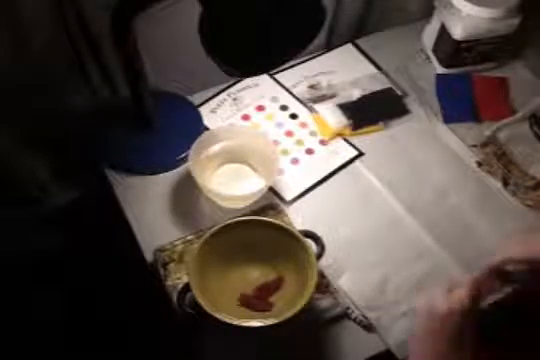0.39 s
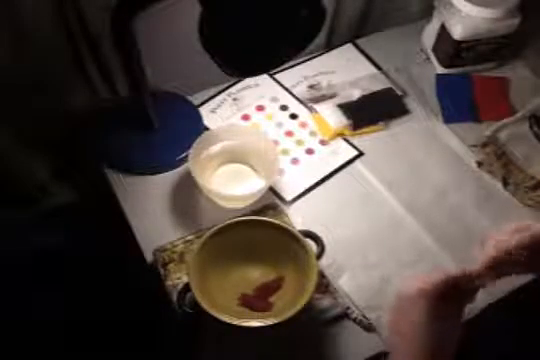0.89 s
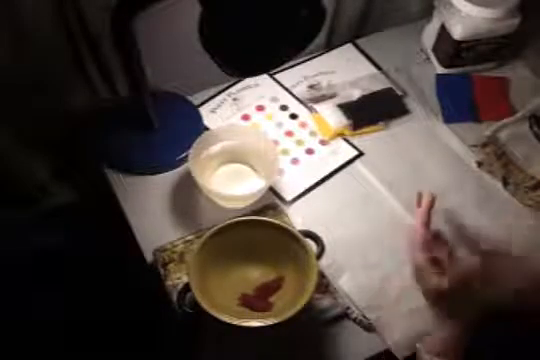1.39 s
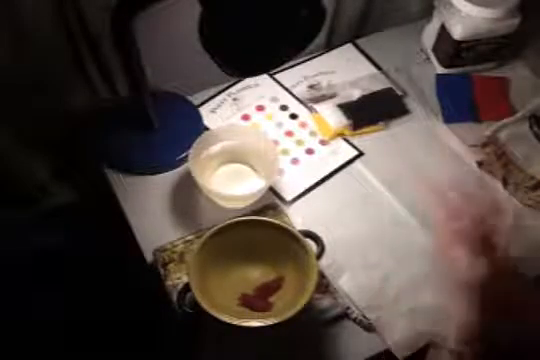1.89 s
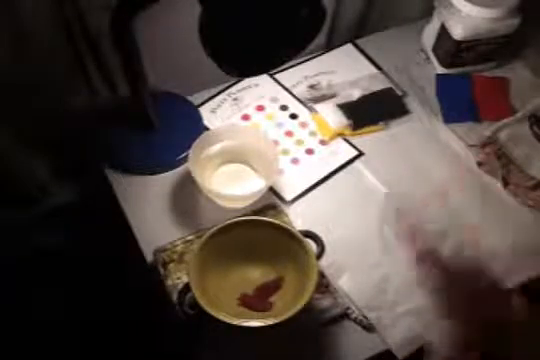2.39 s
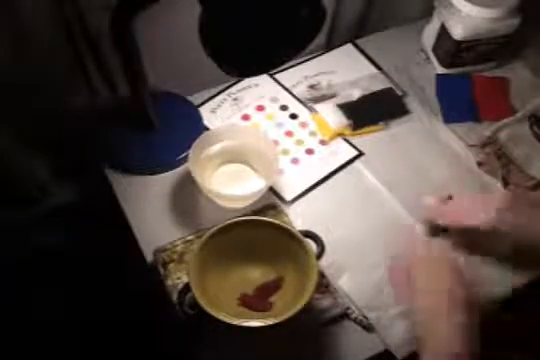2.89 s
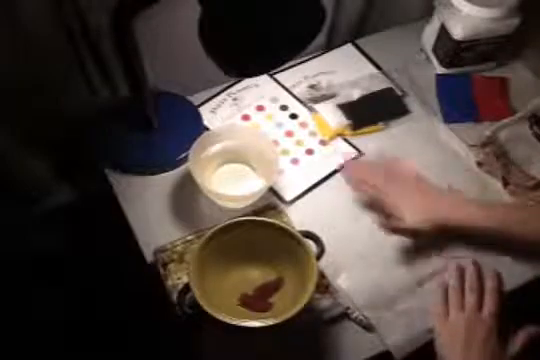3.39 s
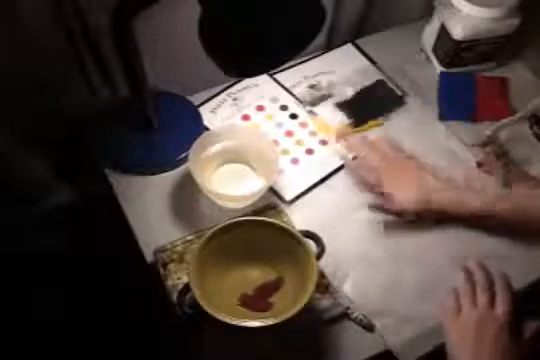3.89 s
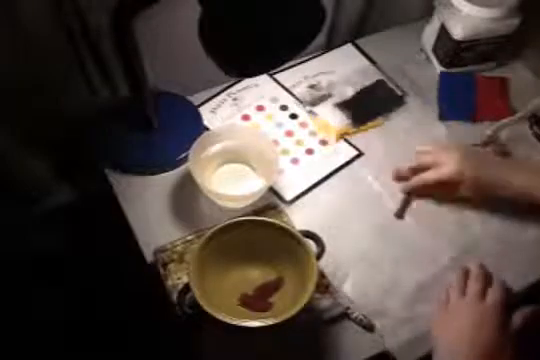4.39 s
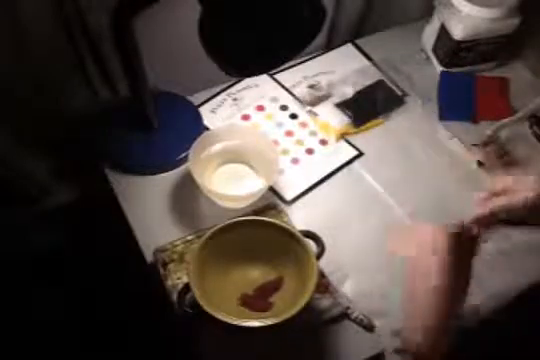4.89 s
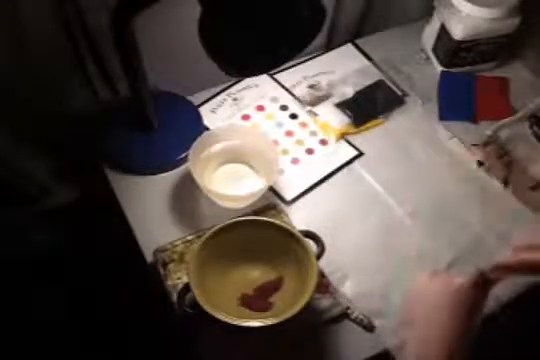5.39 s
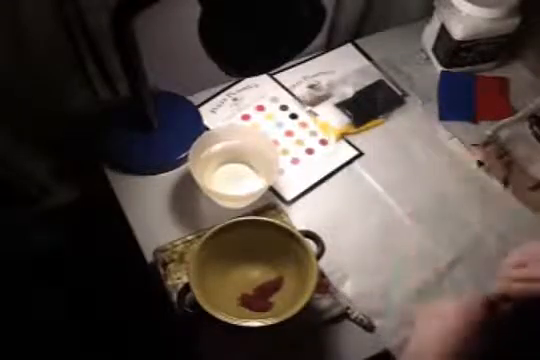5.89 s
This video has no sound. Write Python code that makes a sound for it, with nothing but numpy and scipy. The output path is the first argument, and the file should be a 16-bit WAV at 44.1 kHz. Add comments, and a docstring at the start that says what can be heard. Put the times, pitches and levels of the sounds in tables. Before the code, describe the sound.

A small quiet room hums with faint dull ticks and thin high whistles. A light slap starts a quick series of dry palm rubs, then hands slap hard on a paper-covered table with woody knocks, short rasping sweeps and crackles. After a last crisp rustle only the room remains. Close, cheap, nearly mono microphone.

```python
"""A small room hums with faint dull ticks and thin whistles, close to a cheap camera, all but mono.
Then hands slap, rub together, and slap and roll a small lump over a paper-covered table.
Skin and paper hiss as grains of coloured noise; blows ring the table top as a bank of damped modes.
The camera samples at 16 kHz, so a weak mirror of the treble stands above 8 kHz."""
import sys
import numpy as np
from scipy import signal
from scipy.fft import rfft, irfft, next_fast_len
from scipy.io import wavfile
from scipy.ndimage import uniform_filter1d

SR = 44100
rng = np.random.default_rng(int(sys.argv[2]) if len(sys.argv) > 2 else 0)


def output_pcm(signal):
    """Save a mono or channel-first signal as 16-bit PCM at the path in sys.argv[1].

    Samples are clipped to [-1, 1] before scaling.
    """
    pcm = np.clip(np.atleast_2d(signal).T, -1, 1) * 32767
    wavfile.write(sys.argv[1], SR, np.round(pcm).astype(np.int16))


def elevation(decibels):
    """Turn decibel levels (scalar or array-like) into linear amplitude ratios."""
    levels = np.asarray(decibels, float)
    return 10 ** (levels / 20)


N = 275623
T = np.arange(N) / SR
CREST_DB = 8  # a noise is taken to peak this far above its rms

# modes of the table top: (pitch_hz, undamped width_hz, level_db)
MODES = [(130, 21.6, -3.5), (222, 46, -5), (330, 40.6, 1.5), (483, 67, 1), (660, 90, 4.5), (850, 102, -0.5),
         (944, 130, -3), (1180, 133, 0.5), (1495, 70, -1), (2070, 790, -7.5)]


def unit(x):
    """Scale to rms 1."""
    return x / np.sqrt(np.mean(np.abs(x) ** 2))


def colour(x, points):
    """Shape a noise by (pitch_hz, level_db) points, joined along log frequency; rms 1."""
    hz, db = np.transpose(points)
    size = next_fast_len(N)
    f = np.arange(size // 2 + 1) * SR / size + 1  # 1 Hz up, to keep the logarithm finite
    gain = elevation(np.interp(np.log(f), np.log(hz), db))
    return unit(irfft(rfft(x, size) * gain, size)[:N])


def ring(x, hz, width_hz):
    """One resonance."""
    return signal.lfilter(*signal.iirpeak(hz, hz / width_hz, fs=SR), x)


def walk(rate):
    """Random levels, drawn rate times a second and slewed from one to the next; rms 1."""
    hold = int(SR / rate)
    levels = rng.standard_normal(N // hold + 1)
    return unit(uniform_filter1d(np.repeat(levels, hold), hold)[:N])


def grains(spread_db, flutter_db, rate):
    """Fibres catch and let go: dense clicks of uneven size that come in flurries."""
    size = np.minimum(rng.exponential(size=N), 6)
    level_db = spread_db * size + flutter_db * walk(rate)
    return rng.standard_normal(N) * elevation(level_db)


def patchy(x, rate, depth_db):
    """The contact wanders over creases, so each third of an octave swells on its own."""
    bands_hz = 1300 * 2 ** np.arange(0, 2.7, 1 / 3)
    out = 0
    for k, hz in enumerate(bands_hz):
        band = ring(ring(x, hz, hz / 3), hz, hz / 3)
        # neighbours alternate in sign so that they add where they overlap
        out = out + (-1) ** k * elevation(depth_db * walk(rate)) * band
    return unit(out)


def strokes(rows, release_db_per_s):
    """Each stroke swells to full grip, holds while its level drifts, then dies away."""
    out = 0
    for full_s, hold_s, db, gain_db, attack_db_per_s in rows:
        t = T - full_s
        hold_s = max(hold_s, .002)
        swell_db = attack_db_per_s * np.minimum(t, 0)
        fade_db = -release_db_per_s * np.maximum(t - hold_s, 0)
        drift_db = gain_db * np.clip(t / hold_s, 0, 1)
        out = out + elevation(np.maximum(db + drift_db + swell_db + fade_db, -200))
    return out


def burst(start_s, rise_ms, t60_s):
    """Grows to its peak as the contact closes, then fades exponentially."""
    t = T - start_s - rise_ms / 1000  # zero at the peak
    growth = 1000 * t / max(rise_ms, .1)
    decay = -np.log(1000) * t / max(t60_s, .005)
    return np.exp(np.minimum(growth, decay))


def tail(x, t60_s):
    """Short diffuse echo of a small room: decaying noise after a 4 ms gap."""
    t = T[:SR // 3]
    echo = rng.standard_normal(len(t)) * np.exp(-np.log(1000) * t / t60_s) * (t > .004)
    return signal.fftconvolve(x, echo / np.linalg.norm(echo))[:N]


def room():
    """Broad hum and hiss: coloured noise whose level drifts slightly."""
    # room spectrum: (pitch_hz, level_db per Hz)
    spectrum = [(25, -33), (42, -11.5), (60, 2.5), (90, 1), (220, -5.5), (350, -6), (850, -11), (1400, -14),
                (1800, -15.5), (4600, -19.5), (5900, -17), (6700, -25.5), (7300, -31.5), (7800, -49)]
    level_db = -50.5 + .4 * walk(3)
    return elevation(level_db) * colour(rng.standard_normal(N), spectrum)


def ticks():
    """Faint puffs of noise in one dull resonance, with a little treble."""
    # ticks: (start_s, nominal peak level_db of the dull part)
    puffs = [(0.1166, -43.5), (0.2493, -42), (0.3805, -43.5), (0.4698, -41), (0.6714, -41), (0.816, -41.5),
             (0.9572, -48), (1.046, -41.5), (1.1802, -43.5), (1.3962, -45), (1.7894, -38.5), (2.364, -43),
             (2.5501, -49), (2.6783, -40), (4.0814, -42), (4.5979, -45.5), (4.7656, -42.5), (4.8958, -44),
             (5.0694, -43.5), (5.7279, -46), (5.7573, -43.5), (5.7794, -43), (6.0851, -43), (6.1094, -45)]
    dull_hz, width_hz, rise_ms, t60_s = 1310, 610, 4.5, 0.12
    noise = rng.standard_normal(N)
    treble = elevation(-6) * unit(ring(ring(noise, 3800, 2500), 3000, 2300))
    dull = unit(ring(ring(noise, dull_hz, width_hz), dull_hz, width_hz))
    envelope = sum(elevation(db - CREST_DB) * burst(s, rise_ms, t60_s) for s, db in puffs)
    return (dull + treble) * envelope


def whistles():
    """Breathy near-tones that glide, swell and fade: carriers blurred by slow complex noise."""
    # whistles: (start_s, length_s, first_hz, last_hz, nominal level_db)
    glides = [(0.052, 0.15, 5550, 5700, -55.5), (0.257, 0.13, 6000, 5980, -61),
              (.46, 0.14, 5950, 5820, -58), (0.607, 0.19, 5900, 5950, -60), (0.876, 0.26, 5800, 5950, -58),
              (1.1, .24, 5920, 5920, -56.5), (2.46, 0.2, 5840, 5850, -61), (4.52, .2, 5460, 5540, -50.5),
              (4.638, .33, 5700, 5850, -60), (5.0, .14, 5800, 5930, -55), (5.143, .15, 5900, 6100, -66),
              (5.339, 0.2, 5960, 5950, -52.5), (5.802, .2, 5950, 5930, -64), (6.05, 0.16, 5480, 5510, -49),
              (6.159, 0.17, 5760, 5850, -55)]
    real = uniform_filter1d(rng.standard_normal(N), size=240)
    imaginary = uniform_filter1d(rng.standard_normal(N), size=240)
    blur = unit(real + 1j * imaginary)
    out = 0
    for start_s, length_s, first_hz, last_hz, db in glides:
        u = np.clip((T - start_s) / length_s, 0, 1)  # progress, 0 to 1
        turns = length_s * (first_hz * u + (last_hz - first_hz) * u ** 2 / 2)
        swell = elevation(db) * np.sin(np.pi * u) ** 0.78
        out = out + swell * np.real(blur * np.exp(2j * np.pi * turns))
    return out


def palms():
    """Dry skin sliding on skin: a fine, uneven hiss."""
    # palm against palm, one row a stroke: (full_grip_s, hold_s, friction level_db, held gain_db)
    rubs = [(1.64, .03, -44.5, 0), (1.745, .058, -42.5, 0), (1.885, .043, -48, 4.5), (1.975, 0.045, -46, 8),
            (2.1, 0.063, -42.5, -1), (2.215, 0.045, -45, 8), (2.32, 0.071, -47, 6.5)]
    # skin spectrum: (pitch_hz, level_db per Hz)
    skin = [(880, -21), (1500, -11.5), (1700, -13), (2390, -7), (2990, -1), (3600, -6), (4470, -2.5),
            (5660, 0.5), (6870, -8), (7900, -19), (10300, -43), (17400, -120)]
    attack_db_per_s, release_db_per_s = 452, 554
    grip = strokes([(*row, attack_db_per_s) for row in rubs], release_db_per_s)
    return grip * patchy(colour(grains(1.2, 1.5, 120), skin), 30, depth_db=2.6)


def table(x):
    """The board under the paper; the resting hand damps its modes to broad humps."""
    damping = 2.5  # times the undamped width
    out = 0
    for k, (hz, width_hz, db) in enumerate(MODES):
        out = out + (-1) ** k * elevation(db) * ring(x, hz, damping * width_hz)
    return out


def knocks():
    """The heel of the hand sets off the board's modes; each spot wakes mostly those near one pitch."""
    # knocks of the table top: (start_s, level_db, pitch_hz that the struck spot favours)
    hits = [(1.541, -29, 640), (2.892, -14.5, 955), (2.897, -22.5, 624), (2.914, -32, 130),
            (3.138, -32, 1180), (3.141, -22, 330), (3.156, -20.5, 179), (3.258, -28.5, 460),
            (3.408, -26.5, 660), (3.424, -28, 660), (3.479, -25, 660), (3.708, -29, 780)]
    out = 0
    for start_s, db, spot_hz in hits:
        t = np.clip(T - start_s, 0, None)
        onset = 1 - np.exp(-t / 0.0012)
        for hz, width_hz, mode_db in MODES:
            # 19 dB less for each octave away from the favoured pitch
            share = elevation(db + mode_db - 19 * abs(np.log2(hz / spot_hz)))
            decay = np.exp(-np.pi * width_hz * t)
            out = out + share * onset * decay * np.sin(2 * np.pi * hz * t)
    return out


def paper():
    """Sweeps and slaps rustle the sheet and push on the board."""
    # hand pressed along the paper, one row a sweep:
    # (full_grip_s, hold_s, friction level_db, held gain_db, attack_db_per_s)
    sweeps = [(2.885, .02, -29, -1, 1500), (3.15, .025, -36, -3, 1500), (3.26, .1, -53, 0, 500),
              (3.409, .03, -23, -1, 1800), (3.475, 0.058, -17, -2.5, 700), (3.6, 0.053, -34, 1, 400),
              (3.695, 0.016, -22.5, 2, 500), (3.748, 0.036, -30, -8.5, 800), (3.84, .09, -51, 0, 500),
              (3.955, .015, -42, 2, 800), (4.03, .15, -54, 4, 400), (4.315, 0.12, -47, -3, 500)]
    # slaps and crackles: (start_s, nominal paper peak level_db, table_db relative to it, brightest_hz)
    blows = [(1.541, -12.5, -14, 3630), (1.5644, -34, -13, 5250), (2.6306, -44, -11, 4550),
             (2.867, -8.5, -25, 7100), (2.8904, -9.5, -8.5, 4760), (2.9245, -16.5, -29, 6630),
             (2.95, -29, -13, 6900), (3.1306, -17.5, -8, 5900), (3.1381, -13.5, -11.5, 5950),
             (3.1644, -30, -24, 6270), (3.241, -30, -15, 4840), (3.2592, -40, 12.5, 5460),
             (3.2863, -26, -16, 4840), (3.3167, -28.5, -11, 6240), (3.3333, -30.5, 0, 3230),
             (3.375, -24, -20, 5740), (3.3884, -42, 2.5, 5940), (3.4085, -23, -21, 4170),
             (3.483, -5, -19, 4490), (3.503, -23, -17, 4970), (3.5194, -7, -36, 4400),
             (3.6513, -17, -34, 5040), (3.6963, -11.5, -17.5, 4810), (3.711, -7.5, -20.5, 4830),
             (3.7475, -12, -25, 4700), (3.901, -25, -18, 4840), (3.946, -33, -7, 4950),
             (4.021, -24.5, -16, 5640), (4.134, -30.5, -31, 5400), (4.16, -31, -23, 6170),
             (4.187, -27, -39, 6230), (4.211, -10, -29.5, 5500), (4.224, -29, -6, 5170),
             (4.2933, -27, -32, 6200), (4.343, -23.5, -31, 5430), (4.3554, -24.5, -28, 4230),
             (4.3754, -31.5, -8, 5600), (4.4387, -32.5, -22, 6230)]
    # paper spectrum: (pitch_hz, level_db per Hz)
    spectrum = [(880, -32), (1500, -11.5), (1690, -6.5), (2620, -7), (2840, -4.5), (3890, -1.5), (4630, 1),
                (6730, -1), (7320, -6.5), (7900, -10.5), (10300, -9), (17400, -120)]
    release_db_per_s = 330
    light_touch_db, light_touch_hz = -40, 3400  # softer sweeps lose what lies under this pitch
    push_db = -18  # share of a sweep that presses into the board
    rise_ms, t60_s = 1, .054  # t60 of a 0 dB slap
    t60_s_per_db = 0.001  # harder slaps ring a little longer

    grip = strokes(sweeps, release_db_per_s)
    fibres = patchy(colour(grains(4.2, 1.9, 300), spectrum), 60, depth_db=1.9)
    highpass = signal.butter(2, light_touch_hz, "high", fs=SR, output="sos")
    thin = signal.sosfilt(highpass, fibres)
    firm = np.minimum(grip / elevation(light_touch_db), 1)
    sheet = grip * (firm * fibres + (1 - firm) * thin)

    rustle = colour(grains(2.8, 1.7, 400), spectrum)
    push = elevation(push_db) * grip
    slaps = 0
    for start_s, db, table_db, bright_hz in blows:
        shape = elevation(db - CREST_DB) * burst(start_s, rise_ms, t60_s + t60_s_per_db * db)
        slap = shape * rustle
        # the struck patch of paper favours one region of the treble
        slaps = slaps + 0.27 * slap + 0.98 * ring(slap, bright_hz, 1520)
        push = push + elevation(table_db) * shape
    board = unit(table(grains(1.8, 0.67, 140)))
    return sheet + slaps + push * board


def scene():
    """Hands near the camera in a small room; left and right differ only faintly, in the treble."""
    near = palms() + paper() + knocks()
    echo = elevation(-10) * tail(near, 0.22)
    mono = near + echo + room() + ticks() + whistles()
    side = elevation(-28) * tail(ring(near, 3000, 6000), 0.012)
    return np.array([mono + side, mono - side])


def band_limit(x):
    """A steep low-pass at the top of the band."""
    return signal.sosfilt(signal.butter(12, 12700, fs=SR, output="sos"), x)


def record(dry):
    """Steep cut below half the camera's rate, a leaky mirror above, a whine heard only while the rest is quiet."""
    rate_hz = 16000
    whine_hz, whine_db = 12000, -86  # the camera's electronic whine; rms while it sounds
    loud_db = -34  # short-term rms above which the whine is absent

    cut = signal.butter(24, 7650, fs=SR, output="sos")
    band = signal.butter(5, [8150, 9400], "band", fs=SR, output="sos")
    lid = signal.ellip(10, .3, 80, 9560, fs=SR, output="sos")
    # multiplying by the sampling rate's tone folds each pitch f to rate - f
    folded = dry * np.cos(2 * np.pi * rate_hz * T)
    mirror = signal.sosfilt(np.vstack([band, lid]), folded)

    loud = uniform_filter1d(dry ** 2, size=1500) > elevation(loud_db) ** 2
    gate = uniform_filter1d(1. - loud, size=600)
    whine = gate * elevation(whine_db) * np.sqrt(2) * np.sin(2 * np.pi * whine_hz * T)
    return band_limit(signal.sosfilt(cut, dry) + elevation(-10) * mirror + whine)


dry = scene()
out = record(dry)
output_pcm(out)
```